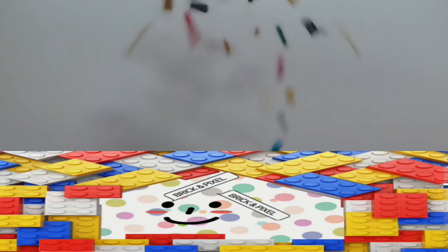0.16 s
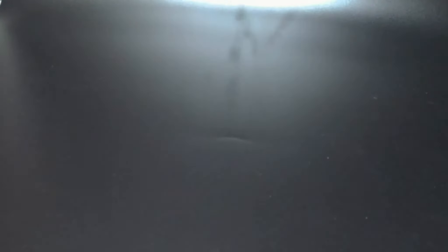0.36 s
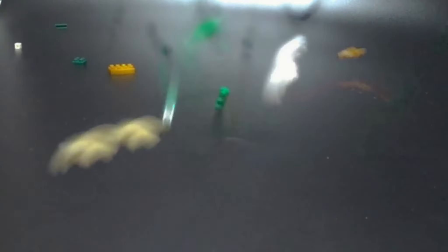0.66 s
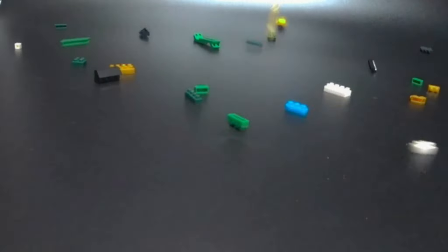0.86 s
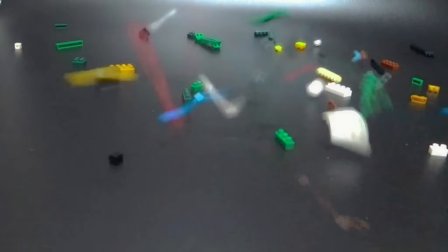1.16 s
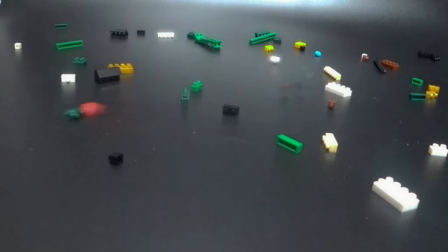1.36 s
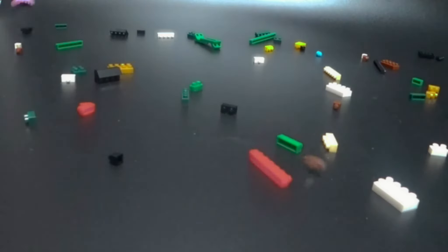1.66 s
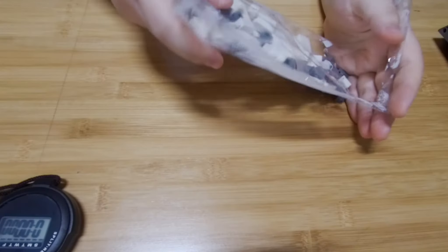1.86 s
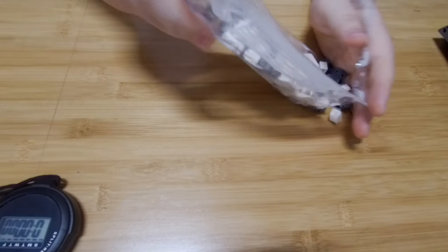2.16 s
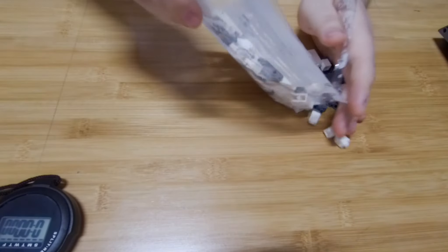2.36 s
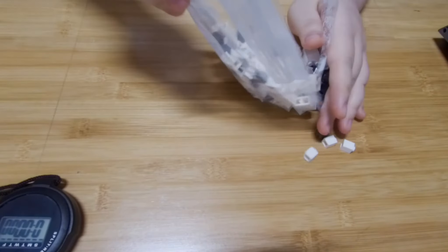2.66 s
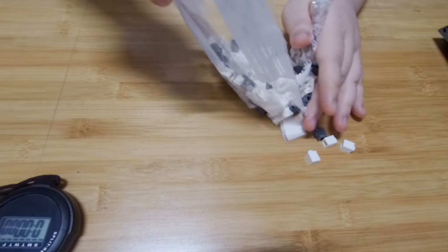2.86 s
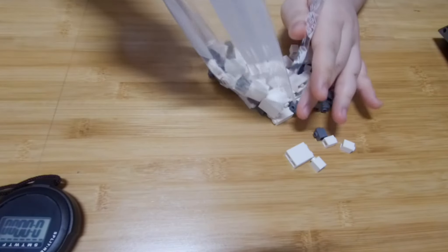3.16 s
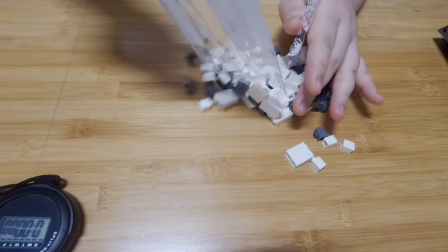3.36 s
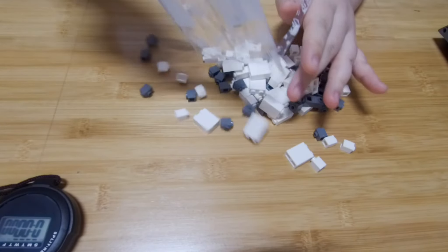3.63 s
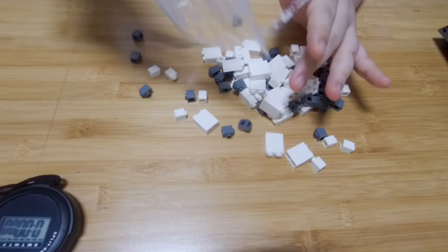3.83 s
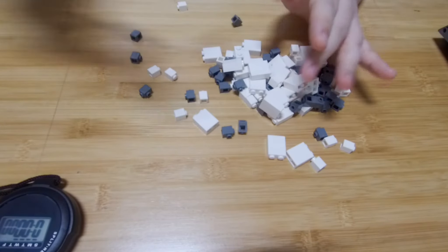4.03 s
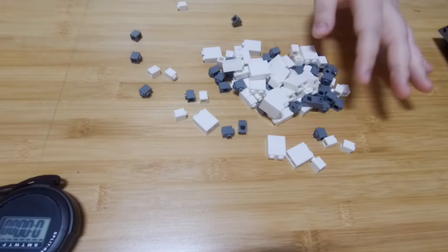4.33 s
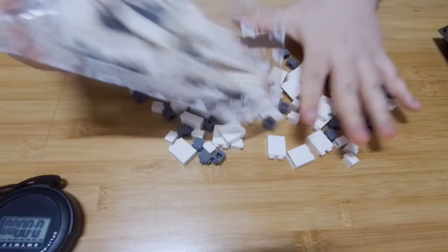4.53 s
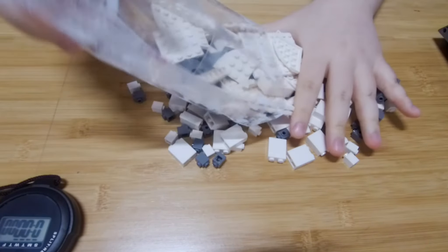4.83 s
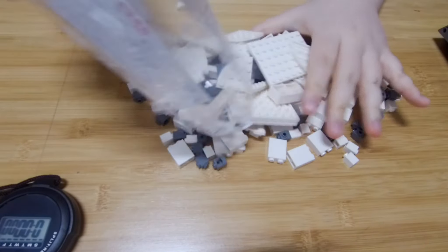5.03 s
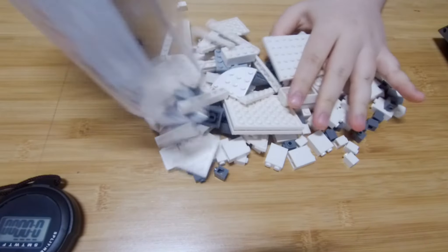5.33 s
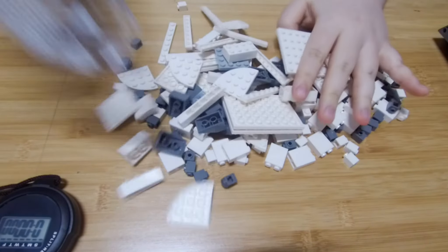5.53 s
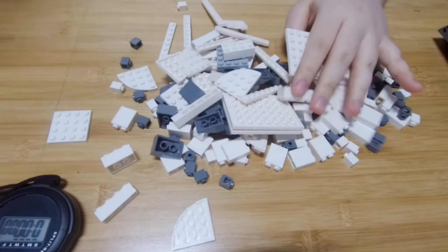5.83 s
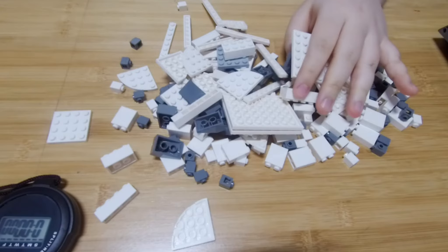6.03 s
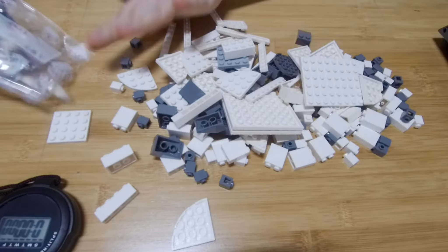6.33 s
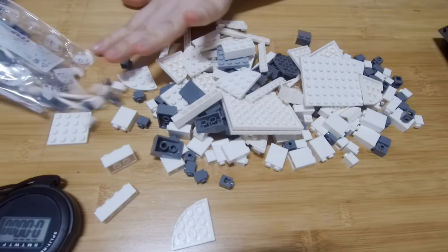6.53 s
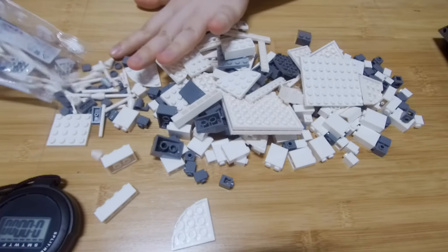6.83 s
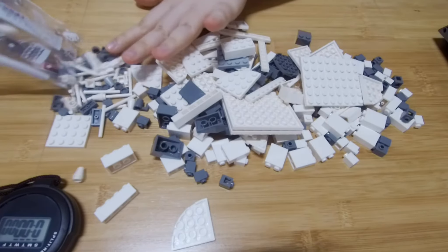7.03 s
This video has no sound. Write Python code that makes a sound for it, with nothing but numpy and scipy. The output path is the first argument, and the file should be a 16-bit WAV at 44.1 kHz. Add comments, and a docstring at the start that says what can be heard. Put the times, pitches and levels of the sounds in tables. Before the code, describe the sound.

Loose small plastic bricks rain onto a hard tabletop in a dense, loud, wide stereo clatter for a second and a half. It stops dead, and after a short silence the sound turns mono and close: a quiet rattling pour onto a wooden table, with ticks and knocks, a near pause, a sudden loud crash of a bigger bagful, then a thinner, brighter trickle. Faint hiss and tiny dropouts run underneath.

```python
"""Small plastic bricks first rain on a hard tabletop, in wide stereo: each is a noisy crack with ringing modes.
After a short silence, in mono, three bags of bricks are tipped in turn onto a wooden table and pushed about
by hand: dense random contacts shake the modes of bricks and wood, with slides, knocks and clacks on top.
The bags drop out for a few milliseconds now and then, and a faint room hiss with a whine lies below them."""
import sys
import numpy as np
from scipy import signal
from scipy.fft import rfft, irfft
from scipy.io import wavfile
from scipy.ndimage import uniform_filter1d

SR = 44100
rng = np.random.default_rng(int(sys.argv[2]) if len(sys.argv) > 2 else 0)


def field_ratio(decibels):
    """Amplitude ratio for a level in dB (20 dB per decade); scalars and array-likes work."""
    return 10 ** (np.asarray(decibels, dtype=float) / 20)


def materialize(psi):
    """Save the field psi as 16-bit PCM at rate SR to the path in sys.argv[1].

    A 1-D psi becomes a single channel; in a 2-D psi each row is a channel.
    """
    bounded = np.clip(np.atleast_2d(psi).T, -1, 1)
    quanta = np.round(bounded * 32767).astype(np.int16)
    wavfile.write(sys.argv[1], SR, quanta)


N = 317079
RAIN_N = round(1.6 * SR)   # samples in the rain part
RAIN_ENDS_S, BAGS_START_S = 1.509, 1.688

# Frequencies on which every filter is drawn
GRID = 8192
GRID_HZ = np.maximum(np.arange(GRID // 2 + 1) * SR / GRID, 1)

# Bricks landing on the hard top. Each row: time in seconds, relative level in dB, the brick's own ring in Hz,
# tabletop thump in dB relative to the landing.
LANDINGS = [(0.0437, -2.5, 6800, -18.5), (0.0749, -7, 6600, -28), (0.0793, -2.5, 8410, -31),
            (0.0928, -0.5, 5850, -16.5), (0.1156, 1, 3440, -20.5), (0.1314, -6.5, 8300, -29),
            (0.1423, 1, 2640, -19), (0.185, -5, 3140, -13.5), (0.191, -10, 2950, -31),
            (0.195, -6.5, 2820, -37), (0.2152, -3, 8500, -31), (0.2233, -1.5, 3280, -24),
            (0.2346, -4.5, 6200, -20), (0.2466, -2.5, 3270, -24), (0.2624, 1, 3500, -22),
            (0.2754, -4, 3780, -24), (0.2842, -1, 7600, -27), (0.2954, -7, 3900, -15),
            (0.3145, -2, 2920, -14), (0.3341, 1.5, 2870, -32), (0.3491, -0.5, 2840, -23),
            (0.4025, -10.5, 3370, -9.5), (0.4254, -4, 6000, -35), (0.43, -1.5, 7600, -28),
            (0.4598, -2.5, 7460, -22), (0.4859, -5.5, 3080, -27), (0.497, 1, 3920, -21.5),
            (0.5095, -2.5, 2800, -15.5), (0.5244, -7, 2910, -26), (0.5538, -10.5, 3680, -9),
            (0.5774, -6, 5530, -23), (0.5853, 0, 5690, -16), (0.5937, -9, 3860, -17),
            (0.6095, -4, 3790, -25), (0.6398, -1, 2890, -18.5), (0.6644, 1, 2930, -25),
            (0.6772, -1.5, 2940, -21.5), (0.693, -5, 3510, -31), (0.706, -1.5, 5630, -28),
            (0.7228, -3, 6800, -31), (0.776, -2, 3770, -26), (0.8206, -4, 6530, -24),
            (0.841, -6, 6700, -18), (0.877, -7, 4900, -21), (0.8914, 1, 3860, -16),
            (0.9223, 1, 6000, -24.5), (0.9834, 1, 5700, -27), (0.9984, -2, 3950, -22.5),
            (1.006, -5.5, 6590, -29.5), (1.015, -9.5, 6820, -36), (1.0432, -0.5, 2950, -30),
            (1.0595, -7, 7720, -15), (1.0724, -1.5, 3100, -20), (1.1069, -2, 3540, -16),
            (1.1308, -5, 8010, -28), (1.1414, -2.5, 2830, -35.5), (1.1583, 0, 2900, -21.5),
            (1.1788, 2, 6000, -26), (1.1986, -0.5, 3000, -22.5), (1.2106, -2.5, 3000, -26.5),
            (1.2163, -1, 7890, -26.5), (1.2335, -6.5, 8160, -32), (1.2374, -5.5, 7630, -27),
            (1.274, -2.5, 2970, -20), (1.2844, -3.5, 7550, -23.5), (1.294, -5, 6700, -31),
            (1.3168, -5.5, 6300, -24.5), (1.351, -8, 6540, -27.5), (1.374, -4.5, 2900, -24),
            (1.3864, -0.5, 2930, -31), (1.4197, -6.5, 4700, -24), (1.4298, 0.5, 5690, -27),
            (1.4481, 0.5, 2840, -19), (1.495, -7.5, 6570, -30.5)]
# Weaker landings and bounces, at random between them. Each row: time in seconds, relative level in dB.
BOUNCES = [(.03, -75), (.2, -81), (.26, -47), (.44, -38), (.48, -60), (.52, -31.5), (.85, -36.5),
           (.93, -42.5), (.975, -53), (1.0, -40.5), (1.25, -37), (1.37, -37.5), (1.41, -42), (1.5, -39)]
BOUNCES_PER_S, BOUNCE_SPREAD_DB = 400, 2
# Tone of the cracks. Each row: frequency in Hz, relative gain in dB.
RAIN_COLOUR = [(24, -60), (40, -29), (255, -32.5), (476, -19.5), (627, -23.5), (983, -8), (1430, -28.5),
               (1660, -3), (2880, -5), (15800, -10)]
# Modes of the hard tabletop. Each row: frequency in Hz, width in Hz, relative level in dB.
HARD_TOP = [(473, 33, -13.5), (729, 28, -13), (973, 53, -3.5), (1274, 46, -1.5), (1675, 117, 6.5)]
# Modes of the commonest small brick. Each row: frequency in Hz, width in Hz, relative level in dB.
BOUNCE_RINGS = [(2894, 180, 7), (3550, 140, 4.5), (7050, 850, 7.5)]
# Each brick's own ring: relative level, sharpness (frequency over width), overtone relative to the ring
OWN_RING_DB, OWN_RING_Q, OVERTONE_DB = -25, 19., -6
# Two close microphone ports. Each row: frequency in Hz, phase in radians by which the left leads.
PORT_PHASE = [(450, 0.), (1300, 2.6), (3300, 4.2), (4200, 1.3), (6400, 1.0), (15000, .6)]
# Balance of the ports. Each row: frequency in Hz, gain of left over right in dB.
LEFT_LEAN = [(250, -2), (950, 8), (1900, 4), (7500, -0.6)]

# Pouring and pushing, one curve for each bag. Each row: time in seconds, rattle level in dB.
POUR = [
    [(1.69, -39), (1.8, -40), (1.93, -36), (2.125, -37), (2.229, -38.5), (2.285, -50), (2.35, -45.5),
     (2.45, -34.5), (2.516, -40.5), (2.624, -38.5), (2.712, -45), (2.795, -36.5), (2.879, -39),
     (3.25, -34.5), (3.334, -38), (3.554, -42.5), (3.618, -52.5), (3.654, -75.5), (4.24, -74)],
    [(4.25, -49.5), (4.35, -29), (4.396, -33.5), (4.485, -44.5), (4.563, -34.5), (4.66, -29), (4.82, -28),
     (5.006, -30), (5.254, -27.5), (5.322, -33), (5.45, -37), (5.605, -38), (5.673, -57.5), (5.761, -52.5),
     (5.84, -45)],
    [(5.876, -47), (6.116, -41), (6.17, -36.5), (6.778, -36), (6.974, -39.5), (7.042, -44.5), (7.122, -48),
     (7.19, -43.5)],
]
# Times in seconds at which the second and third bag take over.
BAG_CHANGES_S = [4.25, 5.87]
# One row for each bag: contacts per second at a rattle of -35.5 dB, odd pieces in dB relative to the rattle,
# added drum gain below 150 Hz in dB.
BAG_FLOW = [(682, -22, -3.5), (700, -16, 0), (1510, -23, 2.5)]
# Tone of the rattle, one curve for each bag. Each row: frequency in Hz, relative gain in dB.
BAG_COLOURS = [
    [(1060, -29.5), (1800, -11), (2640, 2), (3710, 1), (8140, -3), (8900, -4.5), (15200, -9)],
    [(1060, -37), (1800, -11.5), (2480, -2), (3610, 10.5), (8280, 9), (12700, 6), (15200, 2.5)],
    [(1060, -9.5), (1800, -36), (2480, -1), (5350, -6.5), (8820, -3.5), (11900, 1.5), (15200, -9.5)],
]
# Modes of the commonest piece, one list for each bag. Each row: frequency in Hz, width in Hz,
# level in dB relative to the rattle.
BAG_MODES = [
    [(8940, 180, -7)],
    [(3630, 170, -10.5), (8320, 130, -13), (10970, 540, -9.5)],
    [(5350, 590, -10.5), (7800, 1000, -10), (11880, 243, -3), (14550, 290, -10)],
]
# Tone of the wooden table. Each row: frequency in Hz, relative gain in dB.
TABLE_COLOUR = [(18, -36), (30, -2.5), (158, -13), (257, 0.5), (433, -6), (773, -2), (1020, -4.5),
                (1490, 0), (2600, -10), (3380, -19.5), (5720, -120)]
# Modes of the wood, one list under each bag. Each row: frequency in Hz, width in Hz,
# level in dB relative to the table.
TABLE_MODES = [
    [(273, 44, -13), (760, 150, -6), (1480, 125, -3)],
    [(249, 41, -8), (725, 92, -16), (1425, 250, -7.5)],
    [(400, 14, -13.5), (1660, 180, -6)],
]
# Table level in dB under each bag at a pour of -35 dB.
TABLE_DB = [-38, -38, -41.5]
TABLE_FOLLOWS = 0.76   # dB of table for each dB of pour
# The table's highest mode, as hands and heap cover the wood. Each row: time in seconds, added level in dB.
TOP_MODE = [(2.16, 0), (2.26, -2), (4.2, -9), (6.0, -2), (6.1, 9), (6.35, 5), (7.19, -5)]
# Short slides of a few pieces or a whole heap. Each row: start in seconds, hold in seconds, rattle in dB,
# table in dB relative to the slide's rattle.
SLIDES = [(2.307, 0.011, -36.5, -5), (2.482, 0.014, -33, -0.5), (3.877, 0.019, -58, 2),
          (4.036, 0.031, -51, 7.5), (4.173, .008, -54, 3), (4.267, 0.037, -20, -7.5),
          (4.311, 0.03, -15, -17), (4.681, 0.057, -25.5, -9), (5.703, .025, -46.5, -4),
          (5.774, 0.075, -39.5, -2), (6.133, 0.0064, -33, -3.5), (7.057, 0.024, -44, -5)]
SLIDE_RISE_DB_PER_S, SLIDE_FALL_DB_PER_S = 3000., 750.
# Single knocks out of the pile. Each row: time in seconds, relative level in dB,
# table thud in dB relative to the knock.
KNOCKS = [(1.789, -34, 4.5), (1.931, -22, -9), (1.992, -28, -6), (2.021, -32, 2), (2.056, -28.5, 3.5),
          (2.113, -22.5, 1), (2.257, -27, -14), (2.356, -22, -21), (2.383, -28.5, -1), (2.462, -27, -19),
          (2.4794, -19.5, -5), (2.57, -24.5, -7), (2.601, -28, -25), (2.632, -20, -19), (2.734, -27.5, -24),
          (2.981, -22.5, -10), (2.9978, -18.5, -10), (3.043, -19.5, -10), (3.1168, -25, -15),
          (3.147, -23.5, -17), (3.2674, -35, -23), (3.416, -22, -25), (3.283, -27, -5), (3.49, -22, -8),
          (3.8741, -38.5, 5), (3.937, -50, 8), (4.114, -47, 6), (4.2513, -36, -11), (4.262, -13, -8.5),
          (4.445, -26, -2.5), (5.331, -19.5, -2.5), (5.682, -36, -9), (6.0434, -25, -4), (6.0527, -24, -8),
          (6.096, -23.5, -4)]
# Pieces that click and ring out of the second heap. Each row: time in seconds, relative level in dB,
# ring in Hz.
CLACKS = [(4.983, -15, 10740), (5.103, -22, 7300), (5.178, -17, 7300), (5.201, -14.5, 6180),
          (5.232, -10, 8930), (5.2767, -11.5, 8330), (5.3986, -21, 4350), (5.4095, -18, 4350),
          (5.5019, -18, 10880), (5.5912, -26.5, 8800), (5.7387, -24.5, 3710), (5.799, -21, 5500)]
# Brief dropouts. Each row: start in seconds, length in milliseconds.
CHOKES = [(1.8368, 5.2), (1.907, 3.2), (1.996, 3.3), (2.449, 10), (2.465, 11), (2.5714, 14.6), (2.6331, 32),
          (2.687, 9.7), (2.736, 12.6), (2.7668, 17), (2.913, 6.5), (2.9232, 14.3), (2.9418, 25.7),
          (3.0027, 20), (3.069, 12.8), (3.121, 21), (3.2232, 14.4), (3.344, 21), (3.4256, 14),
          (3.531, 12.4), (3.57, 22), (4.583, 7.1), (4.667, 2.3), (4.799, 6.8), (5.028, 6), (5.09, 6),
          (5.1605, 11.8), (5.188, 4.5), (5.2382, 3), (5.3333, 16.5), (5.3811, 11.4), (5.428, 6.5),
          (6.021, 12.6), (6.895, 11.5), (7.1334, 13.5)]
# Tone of the steady noise. Each row: frequency in Hz, relative gain in dB.
HISS = [(15, -26), (25, 0), (64, -11.5), (128, -7.5), (295, -14.5), (2520, -20.5), (11900, -22.5),
        (15200, -22.5)]
HISS_DB = -57.5


def rms_one(x):
    """Scale to an average strength (rms) of 1."""
    return x / np.sqrt(np.mean(x ** 2) + 1e-20)


def in_time(rows):
    """Draw each column of a timed table as a curve with a value at every sample."""
    s, *columns = np.transpose(rows)
    return [np.interp(np.arange(N) / SR, s, c) for c in columns]


def at_hz(points):
    """Draw a curve over frequency on the filter grid, straight in log frequency."""
    hz, value = np.transpose(points)
    return np.interp(np.log(GRID_HZ), np.log(hz), value)


def colour(x, gain_db):
    """Filter to the given gain without sounding early: minimum phase from the folded cepstrum."""
    cepstrum = irfft(gain_db * np.log(10) / 20, GRID)
    cepstrum[1:GRID // 2] *= 2
    cepstrum[GRID // 2 + 1:] = 0
    response = irfft(np.exp(rfft(cepstrum)), GRID)
    return signal.oaconvolve(x, response)[:len(x)]


def resonate(x, hz, width_hz):
    """One vibrating mode as a two-pole filter: the narrower it is, the longer it rings."""
    r = np.exp(-np.pi * width_hz / SR)
    return signal.lfilter([1, 0, -1], [1, -2 * r * np.cos(2 * np.pi * hz / SR), r * r], x + 1e-18)


def low_pass(x, cut_hz):
    """Cut the top steeply."""
    return signal.sosfilt(signal.ellip(8, .5, 55, cut_hz, fs=SR, output="sos"), x)


def high_pass(x, cut_hz):
    """Cut the low end gently."""
    return signal.sosfilt(signal.butter(2, cut_hz, "high", fs=SR, output="sos"), x)


def typed(rows, extra_db, count):
    """Turn table rows into single-sample clicks at their times and levels."""
    rows, out = np.array(rows), np.zeros(count)
    out[np.round(rows[:, 0] * SR).astype(int)] = field_ratio(rows[:, 1] + extra_db)
    return out


def scattered(per_s, spread_db, count):
    """Random contacts, many weak and few strong; rms 1 whatever the rate."""
    sizes = field_ratio(spread_db * np.minimum(rng.exponential(1, count), 4))
    happens = rng.random(count) < per_s / SR
    return rms_one(sizes * happens / np.sqrt(per_s))


def burst(clicks, t60, rise_s=1e-5):
    """Each contact lets out a puff of noise that swells briefly, then falls 60 dB in t60 seconds."""
    power = signal.lfilter([1], [1, -field_ratio(-120 / (t60 * SR))], clicks ** 2 + 1e-18)
    slow = np.exp(-1 / (rise_s * SR))
    envelope = np.sqrt(signal.lfilter([1 - slow], [1, -slow], power))
    return envelope * rng.standard_normal(len(clicks))


def rain():
    """The right port hears part of the left sound turned in phase, part of its own: a wide, phasey image."""
    bounce_gain = field_ratio(in_time(BOUNCES)[0][:RAIN_N])
    bounces = bounce_gain * scattered(BOUNCES_PER_S, spread_db=BOUNCE_SPREAD_DB, count=RAIN_N)
    # one random size (-1, 0 or 1) holds from just before each landing until the next
    landing_s = np.sort(np.array(LANDINGS)[:, 0])
    latest = np.searchsorted(landing_s, np.arange(RAIN_N) / SR + .0002)
    sizes = rng.integers(-1, 2, len(LANDINGS) + 1)[latest]
    left, other = rain_voice(bounces, sizes), rain_voice(bounces, sizes)
    turn = np.roll(irfft(np.exp(-1j * at_hz(PORT_PHASE)), GRID), GRID // 2)
    turned = signal.oaconvolve(left, turn)[GRID // 2:][:RAIN_N]
    shared = .65
    right = shared * turned + np.sqrt(1 - shared ** 2) * other
    rumble_db = at_hz([(40, -4.5), (1500, -9.0), (5000, -31.0)])
    rumble = [field_ratio(-49.5) * rms_one(colour(v, rumble_db)) for v in rng.standard_normal((2, RAIN_N))]
    lean = at_hz(LEFT_LEAN) / 2
    pair = low_pass(np.add([colour(left, lean), colour(right, -lean)], rumble), 15470)
    after = np.maximum(np.arange(RAIN_N) / SR - RAIN_ENDS_S, 0)
    pair *= np.where(after > 0, field_ratio(-8.5 - 4300 * after), 1) * (after < .03)   # drops away almost at once
    return np.pad(pair, [(0, 0), (0, N - RAIN_N)])


def rain_voice(bounces, sizes):
    """One independent rendering of the falling bricks: crack, short tail, each brick's ring and the modes."""
    hits = typed(LANDINGS, -6., count=RAIN_N) + bounces
    crack = 1.5 * hits + burst(hits, t60=0.0045, rise_s=.00025)
    crack += field_ratio(-10.5) * burst(hits, t60=0.055, rise_s=0.00029)
    tilt_db = 1.65 * np.log2(np.clip(GRID_HZ, 1500, 15000) / 5000)   # smaller bricks crack brighter
    tone_db = at_hz(RAIN_COLOUR) + 9.18
    out = sum(colour(crack * (sizes == k), tone_db + k * tilt_db) for k in (-1, 0, 1))
    add_own_rings(out)
    return out + rain_modes(bounces, sizes)


def add_own_rings(out):
    """A short noisy blow sets each landed brick ringing at its own pitch and one random overtone."""
    for s, level_db, hz, _ in LANDINGS:
        i = round(s * SR)
        blow = burst(np.eye(1, 1200)[0], t60=.005, rise_s=.001)
        overtone_hz = np.minimum(hz * rng.uniform(1.2, 2.3), 14000)
        ring = resonate(blow, hz, hz / OWN_RING_Q)
        ring += field_ratio(OVERTONE_DB) * resonate(blow, overtone_hz, overtone_hz / OWN_RING_Q)
        out[i:i + len(blow)] += field_ratio(level_db + OWN_RING_DB) * ring


def rain_modes(bounces, sizes):
    """Landings and bounces shake the tabletop's low modes; bounces alone ring the small bricks."""
    out = np.zeros(RAIN_N)
    for hz, width_hz, level_db in HARD_TOP + BOUNCE_RINGS:
        blows = 1.25 * bounces * (rng.random(RAIN_N) < .35)   # a bounce catches only some modes
        spread = .07
        if hz < 2300:   # the tabletop
            thump_db = np.array(LANDINGS)[:, 3] + 3 * rng.standard_normal(len(LANDINGS))
            blows = 0.21 * blows + typed(LANDINGS, thump_db, count=RAIN_N)
            spread = .02
        blows = burst(blows, t60=0.0062, rise_s=0.00088)
        for k in (-1, 0, 1):   # the pitch shifts a little with the brick's size
            out += field_ratio(level_db - 24) * resonate(blows * (sizes == k), hz * (1 + spread * k), width_hz)
    return out


def bags():
    """The three bags in turn, played by the pour and the slides; a louder rattle is also a denser one."""
    flow_db, = in_time(sorted(sum(POUR, [])))
    changes = np.round(np.array(BAG_CHANGES_S) * SR).astype(int)
    bag_number = np.searchsorted(changes, np.arange(N))
    drum_db = np.array(TABLE_DB)[bag_number] + TABLE_FOLLOWS * (flow_db + 35)
    slide_rattle, slide_table = slides()
    rattle_gain = np.sqrt(field_ratio(flow_db) ** 2 + slide_rattle)
    table_gain = np.sqrt(field_ratio(drum_db) ** 2 + slide_table)
    busy = np.split((rattle_gain * field_ratio(35.5)) ** .8, changes)
    top_db = np.split(in_time(TOP_MODE)[0], changes)
    settings = zip(busy, top_db, BAG_FLOW, BAG_COLOURS, BAG_MODES, TABLE_MODES)
    rattle, table = np.hstack([bag(*one) for one in settings])
    return rattle_gain * rattle + table_gain * table


def bag(busy, top_db, flow, spectrum, modes, wood):
    """Dense contacts rattle the pieces and drum on the table; returns both layers."""
    per_s, odd_db, drum_db = flow
    count = len(busy)
    contacts = scattered(np.clip(per_s * busy, 250, 15000), spread_db=4.0, count=count)
    puffs = rms_one(burst(contacts, t60=0.0043))
    tail = rms_one(burst(contacts, t60=0.14))   # the heap and the room smear the contacts
    rattle = rms_one(colour(puffs + 0.83 * tail, at_hz(spectrum)))
    table_db = at_hz(TABLE_COLOUR) + drum_db * (GRID_HZ < 150)
    table = rms_one(colour(0.48 * puffs + tail, table_db))
    for hz, width_hz, level_db in modes:
        blows = contacts * (rng.random(count) < .25)   # only some contacts catch a given mode
        rattle += field_ratio(level_db) * rms_one(resonate(burst(blows, t60=0.019), hz, width_hz))
    for hz, width_hz, level_db in wood:
        gain = field_ratio(level_db + top_db * (hz > 1200))
        table += gain * rms_one(resonate(puffs + 0.26 * tail, hz, width_hz))
    for hz in np.geomspace(3600, 14000, 14):   # odd pieces, each chattering at its own pitch
        chatter = scattered(22. * busy, spread_db=2.5, count=count)
        chatter = burst(chatter, t60=0.04, rise_s=.0015)
        rattle += field_ratio(odd_db) * rms_one(resonate(chatter, hz, 130.))
    return rattle, table


def slides():
    """Each slide climbs very fast, holds and dies away; returns rattle and table power."""
    t, rattle, table = np.arange(N) / SR, 0, 0
    for s, hold_s, level_db, table_db in SLIDES:
        below_db = SLIDE_RISE_DB_PER_S * np.maximum(s - t, 0)
        below_db += SLIDE_FALL_DB_PER_S * np.maximum(t - s - hold_s, 0)
        power = field_ratio(level_db - np.minimum(below_db, 99)) ** 2
        rattle = rattle + power
        table = table + power * field_ratio(table_db) ** 2
    return rattle, table


def knocks():
    """A sharp tick on plastic, made of short noise puffs, with a thud in the wood."""
    clicks = typed(KNOCKS, 0, count=N)
    tick = burst(clicks, t60=0.0033, rise_s=0.00027) + field_ratio(-12.5) * burst(clicks, t60=0.058)
    thud = burst(typed(KNOCKS, np.array(KNOCKS)[:, 2], count=N), t60=0.048)
    return field_ratio(3.5) * high_pass(tick, 2600) + colour(thud, at_hz(TABLE_COLOUR) + 8)


def clacks():
    """A bright tick of noise, and the piece rings briefly at its own pitch."""
    clicks = typed(CLACKS, 0, count=N)
    out = field_ratio(-5.5) * high_pass(burst(clicks, t60=0.016, rise_s=.0005), 3000)
    for s, level_db, hz in CLACKS:
        i = round(s * SR)
        blow = burst(np.eye(1, min(4000, N - i))[0], t60=.04, rise_s=.0015)
        out[i:i + len(blow)] += field_ratio(level_db - 29.5) * resonate(blow, hz, 150.0)
    return out


def choke(x):
    """The signal freezes at a small offset for a few milliseconds; a high-pass then drains the frozen value."""
    open_share, frozen = np.ones(N), np.zeros(N)
    for s, length_ms in CHOKES:
        i, j = round(s * SR), round((s + length_ms / 1000) * SR)
        open_share[i:j] = field_ratio(-45.0)
        frozen[i:j] = field_ratio(-37) * rng.choice([-1, 1])
    out = x * uniform_filter1d(open_share, size=90) + uniform_filter1d(frozen, size=120)
    return high_pass(out, 65)


def hiss():
    """Steady room and microphone noise, with a faint high whine from noise through a narrow resonance."""
    noise = rms_one(colour(rng.standard_normal(N), at_hz(HISS)))
    whine = rms_one(resonate(rng.standard_normal(N), 12300, 200.))
    return field_ratio(HISS_DB) * (noise + field_ratio(-13) * whine)


def scene():
    """Stereo rain of bricks, silence, then the mono bags with their hiss."""
    poured = low_pass(choke(bags() + knocks() + clacks()) + hiss(), 14900)
    fade_in = np.clip((np.arange(N) / SR - BAGS_START_S) / 0.0038, 0, 1)
    return rain() + poured * fade_in


def band_limit(x):
    """A steep low-pass at the top of the band."""
    return signal.sosfilt(signal.butter(12, 16810, fs=SR, output="sos"), x)


def record(dry):
    """Peaks clip at full scale."""
    mix = np.clip(dry, -1, 1)
    return band_limit(mix)


dry = scene()
out = record(dry)
materialize(out)
```